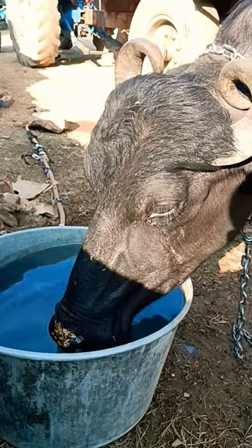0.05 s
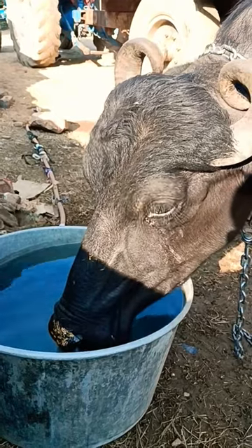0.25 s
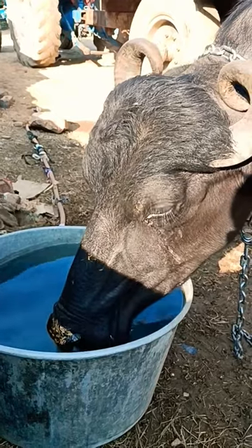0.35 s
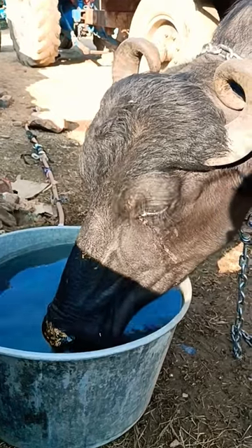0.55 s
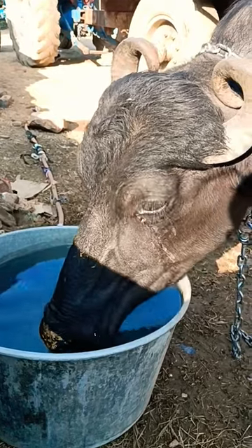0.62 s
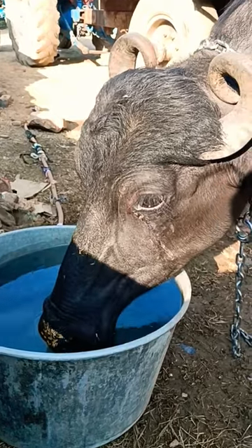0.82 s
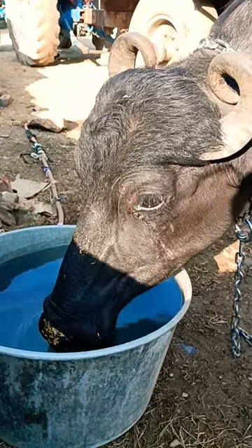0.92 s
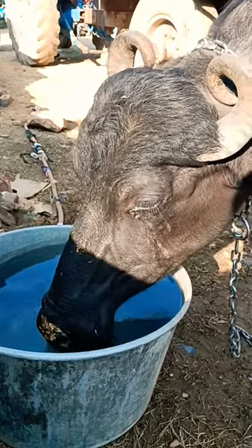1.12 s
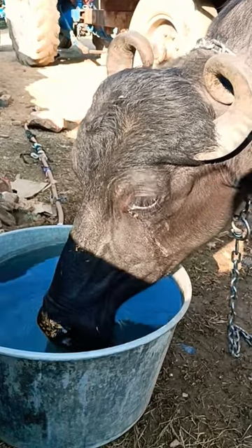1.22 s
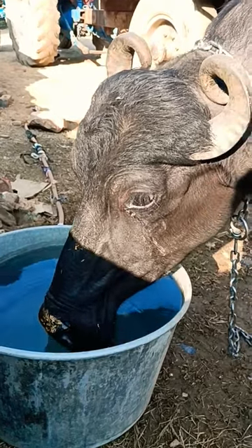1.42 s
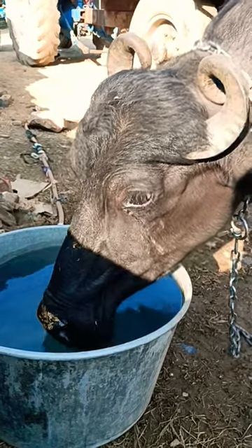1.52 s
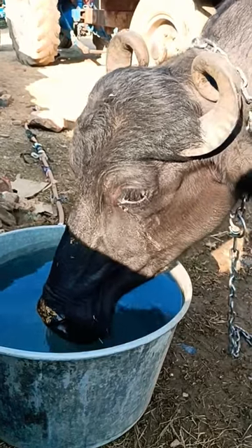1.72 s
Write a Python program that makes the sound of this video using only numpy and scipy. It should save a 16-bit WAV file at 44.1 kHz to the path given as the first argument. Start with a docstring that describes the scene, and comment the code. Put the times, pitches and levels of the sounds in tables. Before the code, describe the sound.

Close by in a quiet yard, a buffalo slurps water from a tub: wet smacks, a snort of air rumbling on the microphone, bubbly gulps, then creaky sucking. Behind it are faint repeated bird chirps and one tiny chain clink.

```python
"""In a quiet yard, a buffalo drinks from a plastic tub, close by. Water creaks in between its lips,
and the lips part with wet smacks that ring its mouth. A puff from its nostrils buffets the right
microphone port, then it gulps with bubbles and low throat tones, and sucks again.
A small bird repeats a rising chirp across the yard, and the tether chain clinks once."""
import sys
import numpy as np
from scipy import signal
from scipy.fft import rfft, irfft, next_fast_len
from scipy.io import wavfile
from scipy.ndimage import uniform_filter1d

SR = 44100
rng = np.random.default_rng(int(sys.argv[2]) if len(sys.argv) > 2 else 0)


def transcribe(u):
    """Save the signal u as a 16-bit wav file named by the first command-line argument.

    u: samples, shape (n,) or (channels, n), limited to [-1, 1]; the rate is SR.
    q: integer samples, one column per channel.
    """
    v = np.clip(np.atleast_2d(u).T, -1, 1)
    q = np.round(v * 32767).astype(np.int16)
    wavfile.write(sys.argv[1], SR, q)


N = 77175  # 1.75 seconds


def amp(db):
    """Turn decibels into a gain to multiply by."""
    return 10 ** (np.asarray(db) / 20)


def fade(t, fade_s):
    """A dying level: every fade_s here is the time to fall by 60 dB."""
    return amp(-60 * t / fade_s)


def unit(x):
    """Scale a sound to an average strength (rms) of 1."""
    return x / np.sqrt(np.mean(x ** 2) + 1e-20)


def along(points, hz):
    """Read a curve of (pitch_hz, value) points on a log pitch axis."""
    pitches, values = np.transpose(points)
    return np.interp(np.log(hz + 1), np.log(pitches + 1), values)


def clock(length_s):
    """The time of each sample, in seconds."""
    return np.arange(int(length_s * SR)) / SR


def filtered(x, response):
    """Turn each frequency up or down by response(hz)."""
    size = x.shape[-1]
    padded = next_fast_len(size + 8192)
    return irfft(rfft(x, padded) * response(np.fft.rfftfreq(padded, 1 / SR)), padded)[..., :size]


def noise(colour, shape=N):
    """Noise of strength 1, shaped by (pitch_hz, level_db) points."""
    return unit(filtered(rng.standard_normal(shape), lambda hz: amp(along(colour, hz))))


def waver(size):
    """A smooth random wobble of strength 1."""
    return noise([(100, 0), (400, -40), (2000, -120)], size)


def add(out, start_s, x, right_db=0):
    """Mix a sound into a stereo track, right_db louder on the right than on the left."""
    first = max(0, round(start_s * SR))
    room = out[:, first:first + x.shape[-1]]
    room += (x * amp([[-right_db / 2], [right_db / 2]]))[:, :room.shape[1]]


def ring(hz, fade_s, attack_s, rise=0):
    """A dying note whose pitch climbs by the share `rise` in each half of fade_s."""
    t = clock(.25)
    cycles = np.cumsum(hz * (1 + rise * np.minimum(2 * t / fade_s, 2))) / SR
    return np.sin(2 * np.pi * cycles) * fade(t, fade_s) * (1 - np.exp(-t / attack_s))


def swell(start_s, length_s, attack_s, fade_s):
    """A level that rises, holds, then fades once length_s is over."""
    t = np.arange(N) / SR - start_s
    return np.clip(t / attack_s, 0, 1) * fade(np.maximum(t - length_s, 0), fade_s)


def glide(length_s, from_hz, to_hz, wobble):
    """A slightly unsteady sliding tone that swells and fades."""
    t = clock(length_s)
    hz = np.linspace(from_hz, to_hz, len(t)) * (1 + wobble * waver(len(t)))
    return np.sin(2 * np.pi * np.cumsum(hz) / SR) * np.sin(np.pi * t / length_s)


# How long echoes last, before stretching: pitch_hz, fade_s
ECHO_FADES = [(200, 0.36), (2000, 0.29), (10000, 0.16)]
def echo(x, stretch):
    """A blur of reflections, different for each ear; high pitches die first."""
    hz, t, bands = signal.stft(rng.standard_normal((2, SR // 2)), SR, nperseg=256)
    bands *= fade(t, stretch * along(ECHO_FADES, hz)[:, None])
    tail = signal.istft(bands, SR, nperseg=256)[1]
    tail = np.pad(tail / np.linalg.norm(tail[0]), ((0, 0), (64, 0)))
    return signal.fftconvolve(x, tail, axes=1)[:, :N]


# Colour of the outdoor air: pitch_hz, level_db
AIR_COLOUR = [(25, -27.5), (84, -0.5), (170, -1), (300, -10.5), (500, -15), (1000, -22), (1500, -16.5),
              (2600, -25), (4000, -29), (6700, -38), (10600, -54.5), (15500, -38)]
# How alike the two ears hear it: pitch_hz, likeness (1 = the same)
AIR_LIKENESS = [(60, 1), (300, 0.7), (1500, 0.16), (6000, 0.039)]
def yard():
    """Quiet, steady outdoor air with a far rumble."""
    def shares(hz):
        angle = np.arccos(np.clip(along(AIR_LIKENESS, hz), -1, 1)) / 2
        return np.array([np.cos(angle), np.sin(angle)])
    out = np.zeros((2, N))
    middle, side = filtered(noise(AIR_COLOUR, (2, N)), shares)
    add(out, 0, amp(-62.5) * np.array([middle + side, middle - side]), right_db=1.5)
    return out


# Notes of a steel link: pitch_hz, level_db, fade_s
LINK_NOTES = [(8095, -18, 0.16), (9230, -21, 0.099), (11960, -3.5, 0.19), (12900, -2, .06)]
# A touch and its bounce: start_s, level_db
CLINKS = [(1.461, -64.5), (1.472, -62.5)]
def chain():
    """Two links touch and bounce; each contact rings them a little differently."""
    out = np.zeros((2, N))
    for start_s, level_db in CLINKS:
        link = sum(amp(db + rng.normal(0, 2.8)) * ring(hz + rng.normal(0, 29), fade_s, attack_s=0.002)
                   for hz, db, fade_s in LINK_NOTES)
        add(out, start_s, amp(level_db) * link, right_db=17)
    return out


# The path of one chirp: time_s, pitch_hz, level_db
CHIRP_SHAPE = [(.02, 3700, -18.5), (0.049, 3770, 7), (0.065, 3980, -15.5), (0.086, 4480, 9),
               (.103, 5150, -9), (.122, 5850, -8)]
# Each call: start_s, level_db
CHIRPS = [(0.174, -58.5), (.468, -56.5), (0.766, -60), (1.055, -59), (1.343, -58), (1.639, -63.5)]
# The fast shaking that roughens a call: rate_hz, level_db
RASP_COLOUR = [(250, -9), (900, -25), (3000, -92)]
def bird():
    """One raspy upward chirp, repeated, fluttering and blurred by the yard."""
    pitch_wobble, flutter_db, rasp_depth = 0.012, 3, 0.29
    out = np.zeros((2, N))
    times, hz, db = np.transpose(CHIRP_SHAPE)
    t = clock(times[-1])
    for start_s, level_db in CHIRPS:
        pitch = np.interp(t, times, hz) * (1 + pitch_wobble * waver(len(t)))
        loudness = amp(level_db + np.interp(t, times, db) + flutter_db * waver(len(t)))
        rasp = unit(1 + rasp_depth * noise(RASP_COLOUR, len(t)))
        add(out, start_s, loudness * rasp * np.sin(2 * np.pi * np.cumsum(pitch) / SR), right_db=12)
    return amp(-4.5) * out + amp(-7.5) * echo(out, stretch=0.77)


# Colour the nose gives to the breath: pitch_hz, level_db
NOSE_COLOUR = [(700, -8.5), (1700, -14.5), (2030, 3), (2400, -5), (2950, -5), (3300, -16.5), (5600, -15),
               (5950, -10), (6400, -22.5), (7350, -5.5), (7900, -21), (10300, -34.5)]
# How hard the puff hits the port: time_s, level_db
PUFF_FORCE = [(.26, -83), (0.307, -52), (0.35, -28), (0.465, -22.5), (.50, -28), (0.549, -30), (0.587, -44),
              (0.629, -41.5), (.74, -52), (.87, -65.5), (0.936, -54.5), (1.031, -76)]
# Colour of the swirling air at its strongest: pitch_hz, level_db
SWIRL_COLOUR = [(25, -33.5), (60, -3.5), (110, 2.5), (195, -3), (260, -12.5), (400, -26.5), (700, -56),
                (2000, -83)]
def nostrils():
    """The buffalo blows out: a soft hiss, and swirls of air that buffet the right port."""
    out = np.zeros((2, N))
    hiss = noise(NOSE_COLOUR) * swell(start_s=0.28, length_s=.27, attack_s=0.03, fade_s=0.26)
    add(out, 0, amp(-58.5) * hiss, right_db=6.5)
    force = amp(np.interp(np.arange(N) / SR, *np.transpose(PUFF_FORCE), left=-120, right=-120))
    travel = np.cumsum((force / force.max()) ** .07)  # weaker air is slower, so it rumbles lower
    swirls = np.array([np.interp(travel, np.arange(N), port) for port in noise(SWIRL_COLOUR, (2, N))])
    power = np.abs(uniform_filter1d(swirls ** 2, size=1800, axis=1))
    swirls /= np.sqrt(power + 1e-9)  # evened out, so the force sets the level
    return out + force * swirls * amp([[-60], [0]])


# Bubbles in the mouth and throat: start_s, level_db, pitch_hz, fade_s, right_db
BUBBLES = [(0.187, -53.5, 403, 0.15, 10), (.229, -33, 844, 0.026, -4), (.2295, -26, 2296, 0.027, 4),
           (.243, -42, 392, 0.074, 17), (.250, -44.5, 513, 0.078, -19), (.256, -35, 1330, 0.022, 8),
           (.259, -31, 2252, 0.057, 2.5), (0.269, -37, 375.6, 0.084, 10), (.297, -35, 355.3, 0.074, 11),
           (.299, -42, 492, 0.047, -26), (.310, -36.5, 782, 0.034, 5.5), (.3335, -29, 1230, 0.015, -1),
           (.513, -28, 1452, 0.023, -1.5), (.551, -32.5, 834, 0.039, -1.5), (.5915, -40, 827, 0.021, 1),
           (.632, -57.5, 826, 0.083, 9), (.630, -46, 331.3, 0.071, 6), (1.16, -52.5, 380, 0.064, 7.5),
           (1.234, -49, 755, 0.076, 13), (1.238, -36, 330, 0.021, 11), (1.246, -43, 398, 0.091, 15),
           (1.262, -37.5, 474, 0.031, 5), (1.274, -38.5, 686, 0.066, -5.5), (1.292, -40, 487, 0.06, 7.5),
           (1.292, -33.5, 651, 0.022, -11), (1.301, -35, 604, 0.022, 2), (1.644, -52.5, 685, 0.061, -2)]
# Wet gurgles: start_s, length_s, level_db
GURGLES = [(0.191, 0.026, -57.5), (0.301, 0.036, -50), (1.238, 0.062, -57.5), (1.643, 0.113, -70.5)]
# Colour of a gurgle: pitch_hz, level_db
GURGLE_COLOUR = [(100, -23), (400, -2), (750, -2.5), (1100, -5), (1550, -4.5), (2300, -17.5), (9000, -45)]
# Tones of swallowing: start_s, length_s, from_hz, to_hz, level_db, right_db
THROAT_TONES = [(.615, 0.032, 170.4, 222, -54.5, 23.5), (.72, 0.098, 123.4, 187.7, -53, 14.5),
                (1.369, 0.13, 243, 245.3, -52, -1.5)]
def gulps():
    """Bubbles ring and rise in pitch over a gurgle of tiny pops and the low tones of the throat."""
    pops_per_s, attack_cycles = 5000, 0.91
    out = np.zeros((2, N))
    for start_s, db, hz, fade_s, right_db in BUBBLES:
        add(out, start_s, amp(db) * ring(hz, fade_s, attack_cycles / hz, rise=0.11), right_db)
    for start_s, length_s, db in GURGLES:
        pops = rng.standard_normal(N) * (rng.random(N) < pops_per_s / SR)
        gurgle = unit(filtered(pops, lambda hz: amp(along(GURGLE_COLOUR, hz))))
        add(out, 0, amp(db) * gurgle * swell(start_s, length_s, attack_s=0.017, fade_s=0.1), right_db=3)
    for start_s, length_s, from_hz, to_hz, db, right_db in THROAT_TONES:
        add(out, start_s, amp(db) * glide(length_s, from_hz, to_hz, wobble=0.01), right_db)
    return out


# Wet smacks of the lips: start_s, level_db, treble_db, tuning_ratio, right_db
SMACKS = [(0.2282, -22.5, -7, 0.99, -7.5), (0.2469, -35.5, 4, .95, 0), (0.2692, -31, 8.5, .95, -5),
          (0.2954, -34, -15, 1, -8), (0.304, -38, -7, 1.5, -3), (0.3194, -39, -10, 0.9, -2),
          (0.5065, -21, 0, 1.003, 3.5), (0.552, -40.5, 6, .98, 6), (.669, -57, -13, 1.02, -5),
          (.690, -54.5, -16, 0.85, -6.5), (0.702, -62, -27, 1.04, 2)]
# Colour of tearing water, also used for the hiss of sucking: pitch_hz, level_db
CRACK_COLOUR = [(500, -32), (900, 0), (2400, 4), (9500, -15), (15000, -48.5)]
# Notes of the hollow mouth: pitch_hz, level_db, fade_s
MOUTH_NOTES = [(1382, 3, 0.011), (1950, -3, .019), (2540, -3.5, 0.017), (3670, -14, 0.025),
               (4595, -9, 0.021), (5740, -7, 0.015), (7200, -22.5, 0.03), (8140, -22, 0.012)]
# Bright bursts of droplets: start_s, level_db
SPITS = [(0.2276, -45), (0.2498, -37.5), (0.2699, -37.5), (.3055, -51)]
# Colour of the droplets: pitch_hz, level_db
SPIT_COLOUR = [(2500, 9.5), (4600, 15.5), (10000, -11.5), (15000, -12)]
def smacks():
    """A film of water snaps: a short crack rings the hollow mouth, and the open lips spit droplets."""
    attack_s, treble_hz = 0.00085, 3000
    out = np.zeros((2, N))
    t = clock(.25)
    for start_s, level_db, treble_db, tuning, right_db in SMACKS:
        crack = noise(CRACK_COLOUR, len(t)) * fade(t, fade_s=0.023) * (1 - np.exp(-t / attack_s))
        hollow = sum(amp(db + treble_db * (hz > treble_hz)) * ring(hz * tuning, fade_s, attack_s)
                     for hz, db, fade_s in MOUTH_NOTES)
        add(out, start_s, amp(level_db) * (hollow + amp(-6.5) * crack), right_db)
    for start_s, db in SPITS:
        add(out, start_s, amp(db) * noise(SPIT_COLOUR, len(t)) * fade(t, fade_s=0.041), right_db=2)
    return out


# Single slips of the lips, most of them strong: start_s, level_db
SLIPS = [(.152, -47), (1.5812, -38.5), (1.5972, -42.5), (1.6082, -42), (1.6133, -41), (1.623, -59),
         (1.6306, -37.5), (1.6424, -43.5), (1.6775, -42), (1.6901, -45.5)]
# Sips of water, each a quick run of weak slips: start_s, length_s, level_db, pitch_hz
SIPS = [(0.015, 0.056, -51, 2606), (0.071, 0.061, -49, 2820), (1.525, 0.056, -51.5, 2410),
        (1.583, .11, -53, 2400), (1.701, 0.058, -47.5, 2335)]
# Notes of the gap between the lips: pitch_ratio, level_db, fade_s
LIP_NOTES = [(0.848, 0.5, 0.018), (1, 9.5, 0.013), (1.172, -1, 0.017)]
# Thin whistles of air and water: start_s, length_s, from_hz, to_hz, level_db
WHISTLES = [(1.13, .11, 1550, 1555, -64), (1.165, .07, 1790, 1860, -69), (1.30, .15, 1050, 2350, -70.5),
            (1.465, .07, 2504, 2490, -59.5), (.41, .08, 547, 496, -55)]
def sucking():
    """Water and air slip through the lips in uneven pulses that ring the gap; small leaks whistle."""
    slips_per_s, timing_scatter, level_scatter_db = 160, 0.1606, 1
    single_slip_hz, lip_band_hz = 2360, [1870, 2946]
    out = np.zeros((2, N))
    slips = [(start_s, db, single_slip_hz) for start_s, db in SLIPS]
    for start_s, length_s, db, hz in SIPS:
        for k, (late, louder) in enumerate(rng.standard_normal((40, 2))):
            if k / slips_per_s < length_s:
                slip_s = start_s + (k + timing_scatter * late) / slips_per_s
                slips.append((slip_s, db + level_scatter_db * louder, hz))
    for start_s, level_db, hz in slips:
        gap = sum(amp(db) * ring(hz * ratio * (1 + rng.normal(0, 0.034)), fade_s, attack_s=0.00057)
                  for ratio, db, fade_s in LIP_NOTES)
        add(out, start_s, amp(level_db) * gap, right_db=-0.5)
    out = signal.sosfilt(signal.butter(4, lip_band_hz, 'band', fs=SR, output='sos'), out)
    out += amp(-9.5) * echo(out, stretch=1.0)
    hiss = noise(CRACK_COLOUR) * swell(start_s=1.6, length_s=N / SR, attack_s=0.012, fade_s=.1)
    add(out, 0, amp(-71.5) * hiss, right_db=8.5)  # the last, hard suck
    for start_s, length_s, from_hz, to_hz, db in WHISTLES:
        add(out, start_s, amp(db) * glide(length_s, from_hz, to_hz, wobble=0.014), right_db=8)
    return out


# Dulling at the left port, which faces away: pitch_hz, gain_db
LEFT_DULLING = [(300, 0.5), (2500, -2.5), (4400, -11.5), (8000, -33.5), (12000, -22), (15000, -8)]
def scene():
    """The mouth echoes in the tub and the yard; all but the outdoor air is later and duller on the left."""
    left_lag_s = .00009
    mouth = smacks() + gulps() + sucking()
    mouth = mouth + amp(-12) * echo(mouth, stretch=0.24) + amp(-12) * echo(mouth, stretch=0.52)
    left, right = mouth + nostrils() + bird() + chain()
    left = filtered(left, lambda hz: amp(along(LEFT_DULLING, hz)) * np.exp(-2j * np.pi * hz * left_lag_s))
    return np.array([left, right]) + yard()


def record(dry):
    """Cut away the very highest treble."""
    return filtered(dry, lambda hz: hz < 15700)


dry = scene()
out = record(dry)
transcribe(out)
```